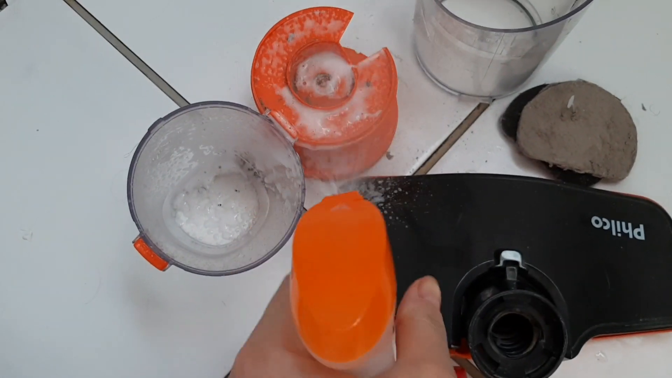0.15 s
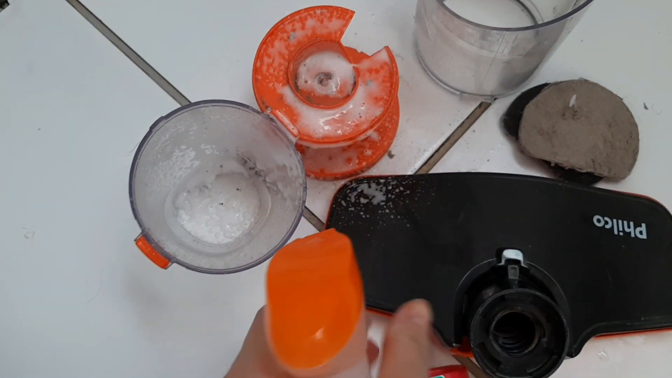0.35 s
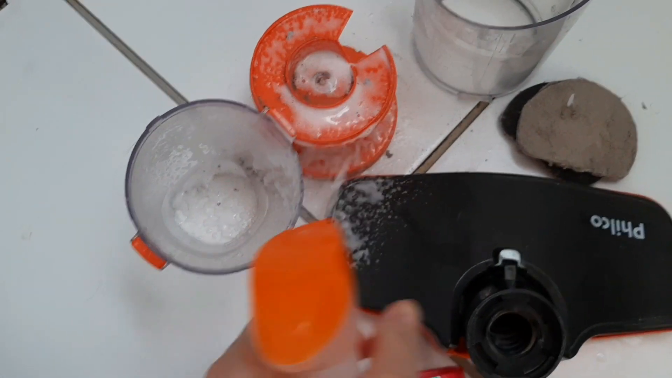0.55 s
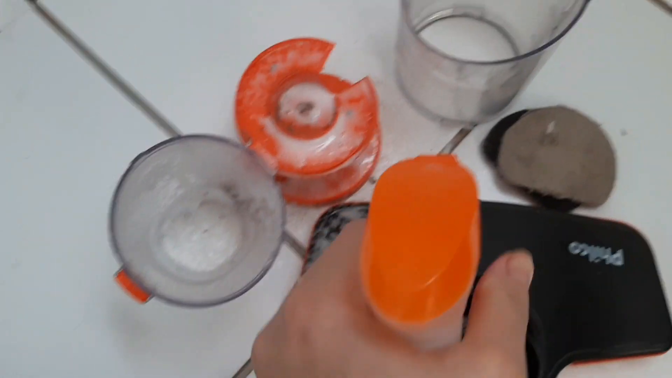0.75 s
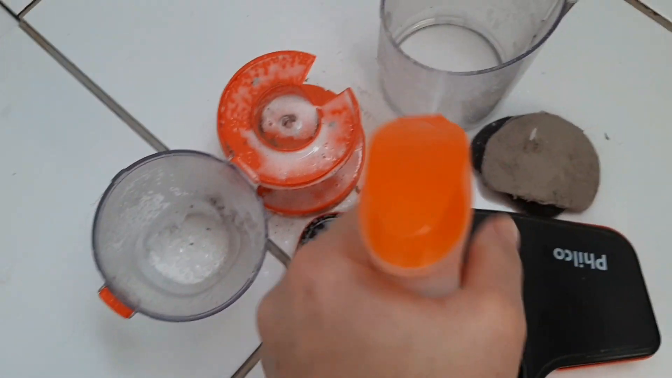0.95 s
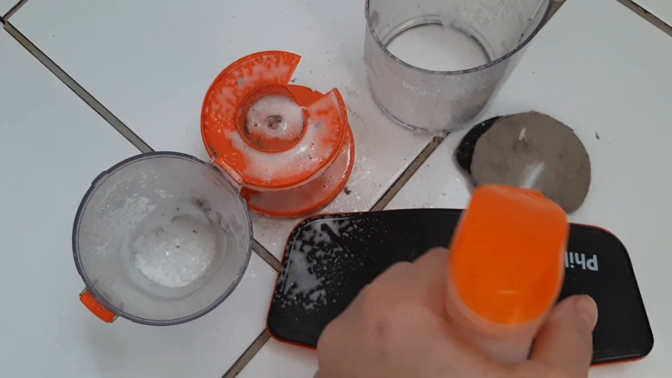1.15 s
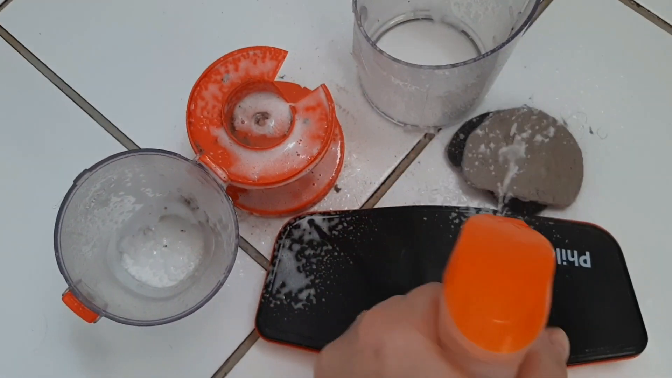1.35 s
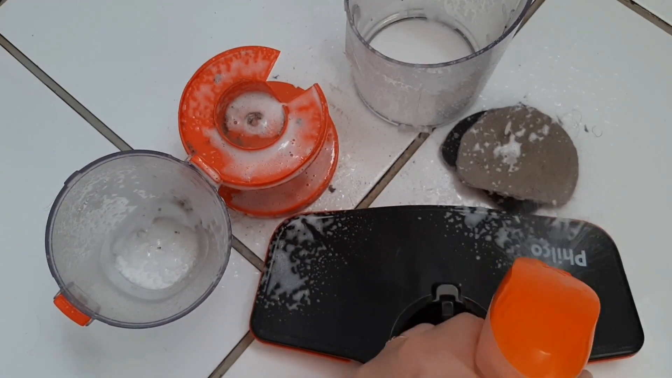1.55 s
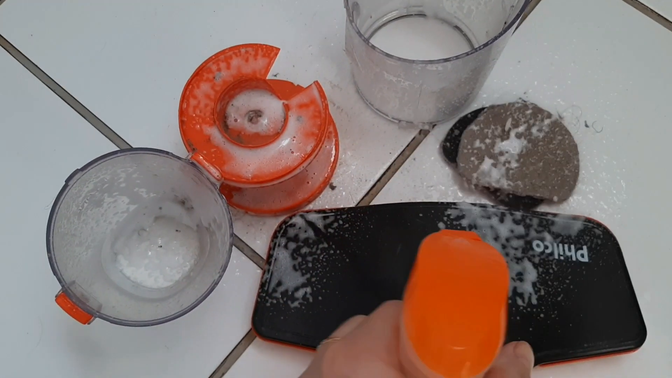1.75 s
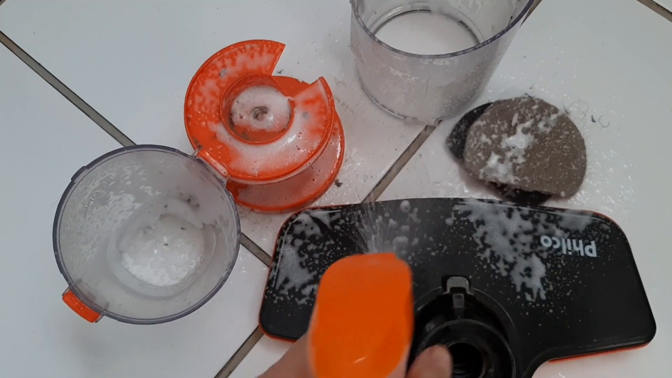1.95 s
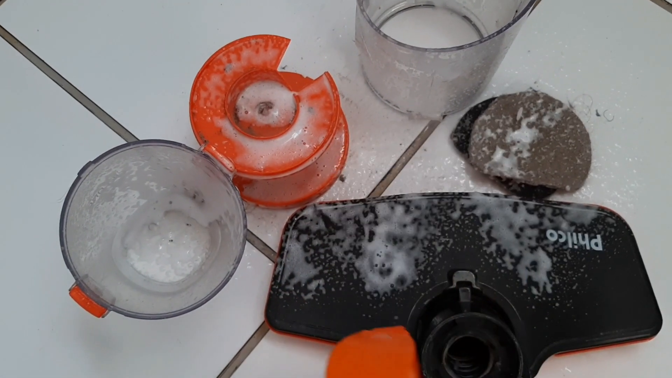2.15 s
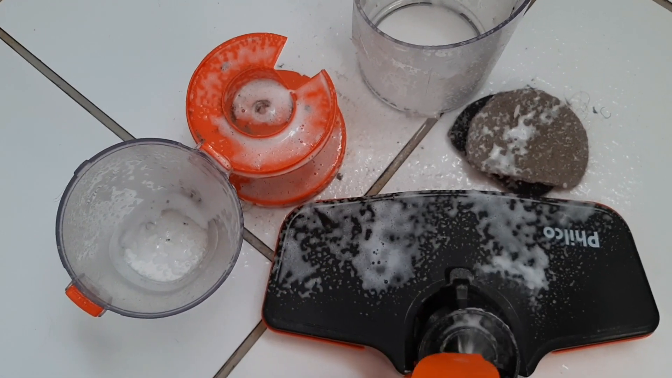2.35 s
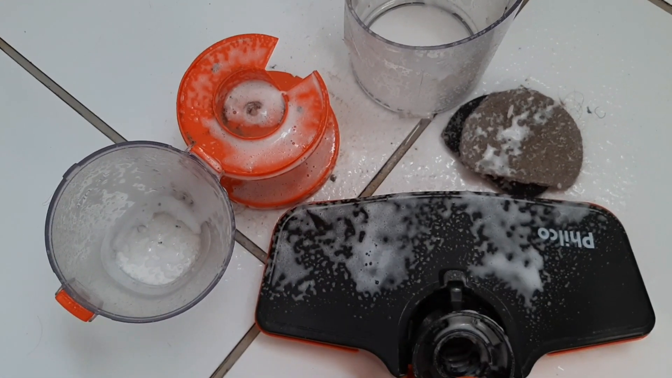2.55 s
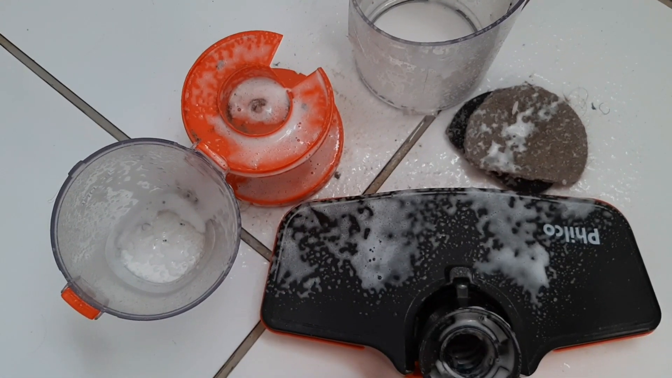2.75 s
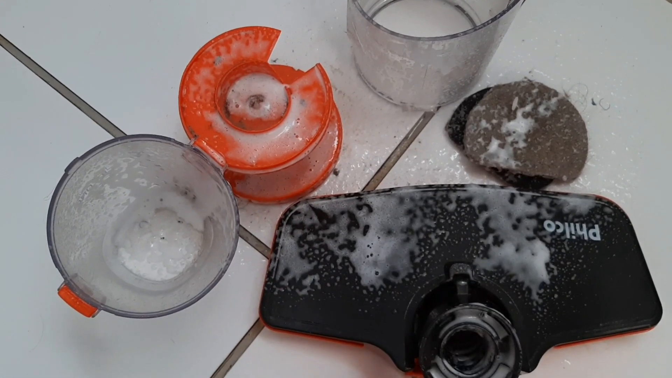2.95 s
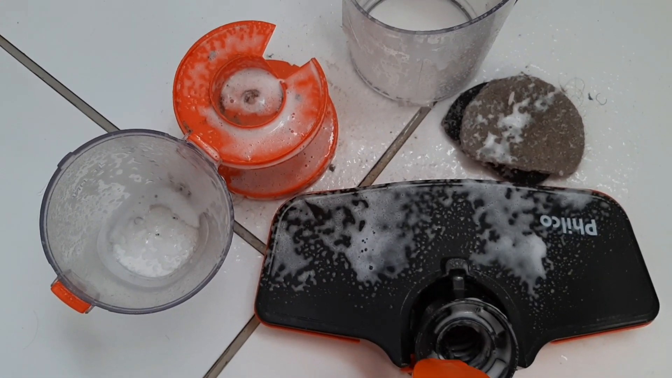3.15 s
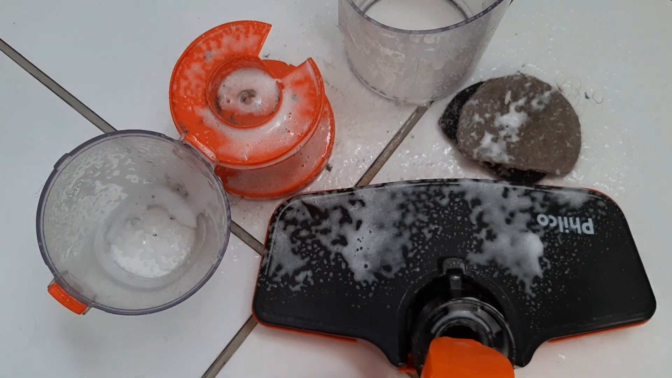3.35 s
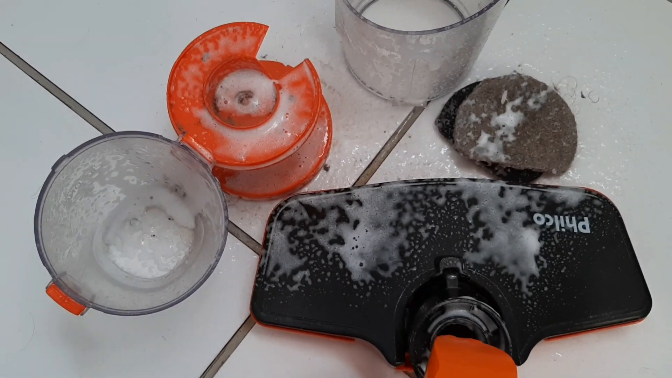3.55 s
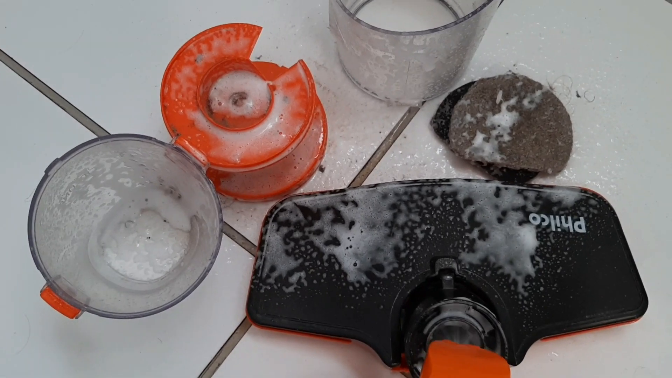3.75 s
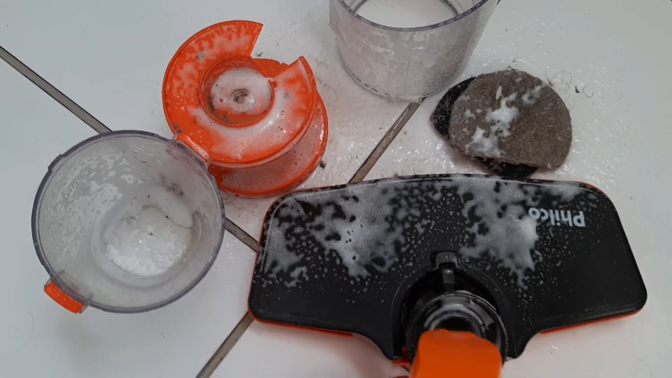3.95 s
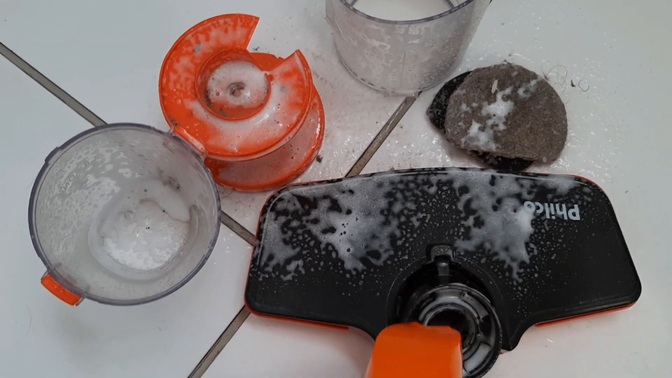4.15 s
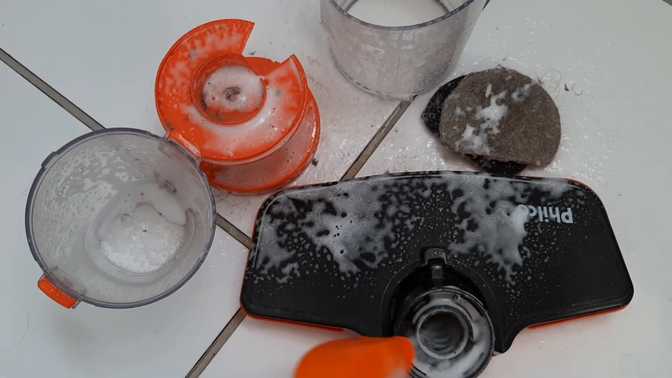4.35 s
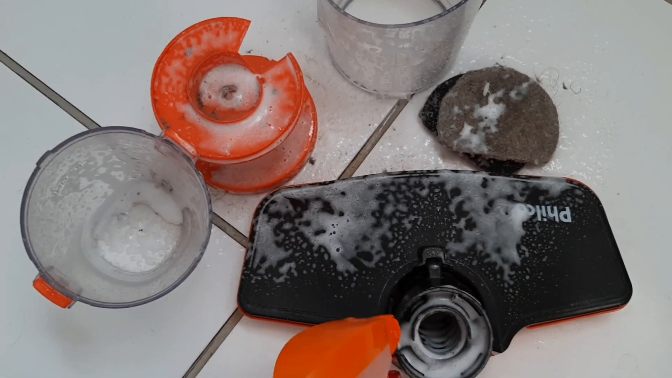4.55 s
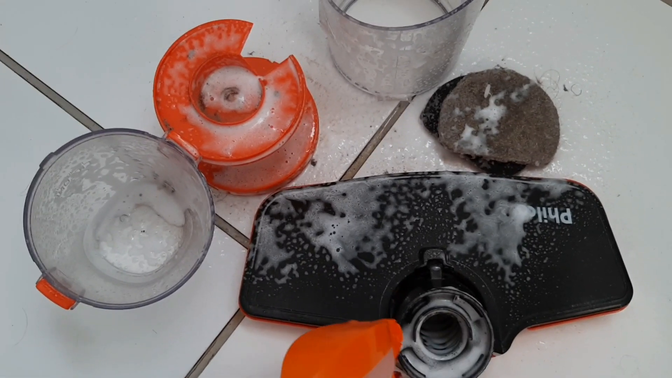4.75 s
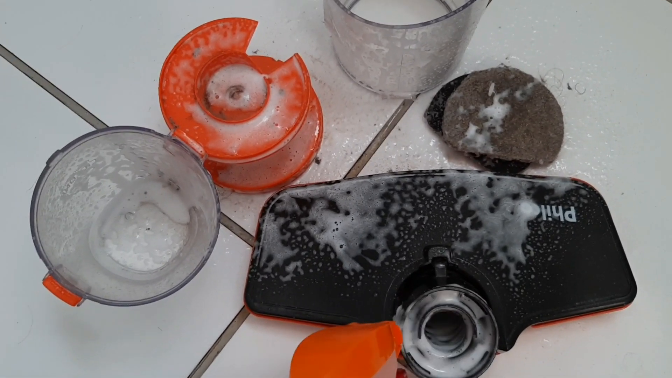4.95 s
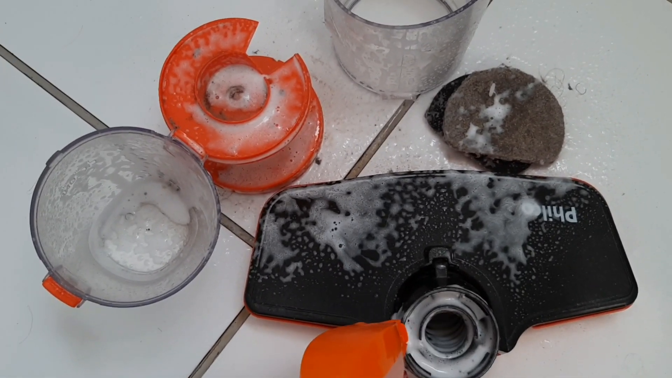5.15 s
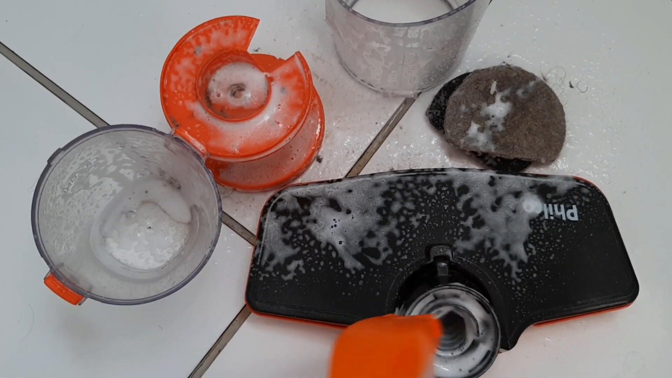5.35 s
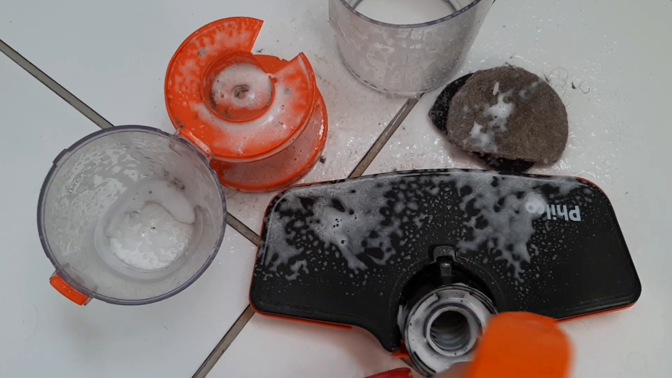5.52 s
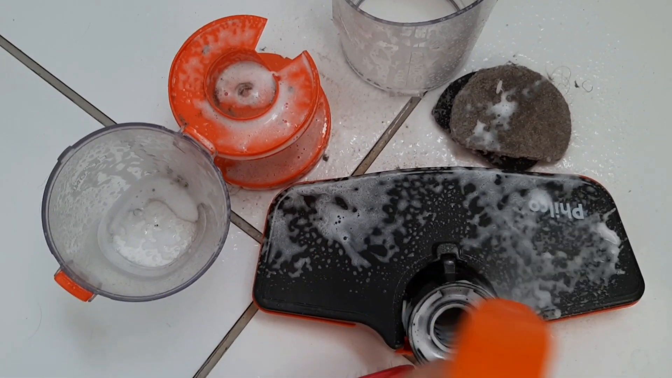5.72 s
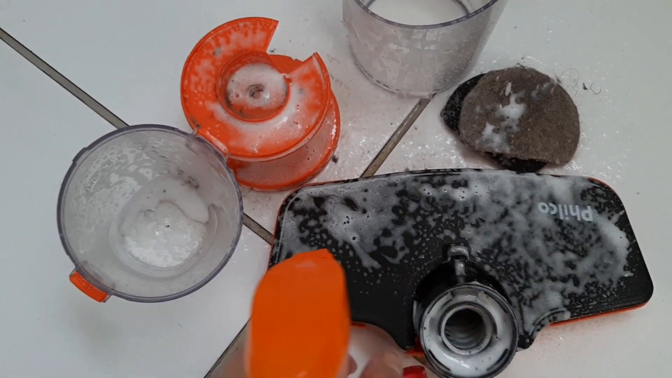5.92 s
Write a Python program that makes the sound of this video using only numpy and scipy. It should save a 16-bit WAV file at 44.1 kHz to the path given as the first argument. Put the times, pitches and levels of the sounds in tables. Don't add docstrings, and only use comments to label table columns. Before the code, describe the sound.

Short, bright bursts of spray patter on plastic parts, the pump gurgling and bottle knocking between squeezes, close up in a quiet tiled room.

```python
import sys
import numpy as np
from scipy import signal
from scipy.fft import rfft, irfft
from scipy.io import wavfile
from scipy.ndimage import uniform_filter1d, map_coordinates

SR = 44100
rng = np.random.default_rng(int(sys.argv[2]) if len(sys.argv) > 2 else 0)


def dump(signal):
    limited = np.clip(np.atleast_2d(signal).T, -1, 1)
    pcm = np.round(limited * 32767).astype(np.int16)
    wavfile.write(sys.argv[1], SR, pcm)


def how_loud(loudness_db):
    steps = np.asarray(loudness_db, float) / 20
    return 10 ** steps


N = 268128

# valve_opens_s, stroke_s, jet_db, mist_db, valve_suddenness_db
SQUEEZES = [(0.048, 0.21, -31.5, 1, 2.5), (0.42, 0.2, -33.5, 0, 7.5), (0.796, 0.24, -35, 1.5, 6.5),
            (1.188, 0.22, -34.5, 1, 1), (1.543, 0.222, -33, -0.5, -6.5), (1.926, .24, -35.5, 0.5, 7.5),
            (2.298, 0.2, -35.5, -1, 8.5), (2.684, 0.21, -36.5, 1.5, 5), (3.698, 0.25, -34, -0.5, 2.5),
            (4.247, 0.26, -35.5, 1, 2.5), (4.837, 0.23, -36.5, 1, 3), (5.253, 0.17, -34.5, 1, 5.5),
            (5.657, 0.21, -34, 2.5, 1.5), (6.019, 0.14, -34, 2.5, 4.5)]
# patter_db, first_hollow_hz, last_hollow_hz
AIMS = [(0, 1330, 1230), (1.5, 1290, 1330), (3, 1240, 1200), (2.5, 1240, 1520), (2.5, 1300, 1240),
        (5, 1400, 1100), (3.5, 1280, 1170), (4.5, 1300, 1240), (5, 1400, 1400), (7, 1200, 1500),
        (3, 1600, 1200), (6.5, 1490, 1490), (5, 950, 1400), (3.5, 820, 1600)]
# duration_s, level_re_jet_db
LEAKS = [(.003, -32), (.018, -30), (.002, -33), (.007, -29), (.009, -25), (.014, -25.5), (.003, -32),
         (.001, -38), (.020, -28.5), (.014, -27), (.020, -31), (.002, -34), (.001, -36), (.002, -32)]
# time_from_opening_s, jet_db, mist_re_jet_db, patter_re_jet_db
PRESSURE_RISE = [(0., -16, 2.5, -19), (0.015, -7.5, 5, -19.5), (0.046, -3.5, 9.5, -18.5),
                 (.09, -2, 11, -17)]
# time_from_stroke_end_s, jet_db, mist_re_jet_db, patter_re_jet_db
PRESSURE_SAG = [(-.06, -0.46, 6.5, -17.5), (-.025, -3.5, 1.5, -17.5), (0., -9.5, -2.5, -14),
                (.04, -23.5, -1, -10.5), (.11, -45, -5, 0)]
# freq_hz, density_db_per_hz
SPRAY_SPECTRUM = [(290, -62), (500, -58), (1010, -32), (1240, -55.5), (1840, -11), (2160, -6.5), (3210, 10),
                  (3660, 9), (5840, 1.5), (8060, -8), (8670, -13), (11100, -12.5), (14700, -10),
                  (15800, -10.5), (16500, -27)]
FULLNESS_DB = [-9, -8, -3.5, -7, -9.5, -4.5, -5, -2.5, -7, -2, -2, -3, -3, -0.5]
CORE_DB = [-5, -1.5, 3, 2, 1, 1, -0.5, 0, -2, -2.5, -1.5, -2, -5.5, -4.5]
STEP_HZ, CORE_TOP_HZ = 3680, 4740
# freq_hz, width_hz, gain_db
PART_PEAKS = [(866, 163, -14.5), (930, 220, -11), (1238, 140, 2.5), (1470, 170, -0.5)]
FLOOR_ECHO_S, FLOOR_ECHO_DB = 0.0001682, -9

# vent_db, hiss_db, hiss_rate_db_per_s, vent_rate_db_per_s, last_foam_db
RELEASES = [(-76, -78.5, -30, -30, -83.5), (-73, -68.5, -87, -6, -87), (-79, -65, 39, 40, -73),
            (-67.5, -62.5, -81, 21, -82), (-72, -78, -140, 5.5, -85), (-71, -65.5, -140, -77, -84),
            (-63, -72, -5, 70, -87), (-73, -71.5, -22, 70, -74), (-66, -67.5, -27, -20, -73),
            (-78.5, -77.5, -73, -16, -91), (-69.5, -80, -130, 30, -70), (-85, -71.5, -120, -56, -79),
            (-57.5, -65.5, -150, -150, -78), (-61, -63.5, -79, 5, -80)]
LET_GO_S, MAX_SUCK_S = 0.036, 0.24
FOAM_DB, FOAM_DB_PER_S, FOAM_LAST_DB_PER_S = -40, -260, -69
# time_s, vent_db, hiss_db
GULPS = [
    (1.47, -60, -65.5),
    (3.25, -77.5, -83),
    (3.32, -70, -82.5),
    (3.4, -81, -100),
    (3.5, -88, -103),
    (4.13, -90, -87),
    (4.2, -71.5, -80),
    (4.574, -64, -69),
    (4.64, -79.5, -74.5),
    (.75, -58, -63.5),
]
GULP_DB_PER_S = 272.5, 194.5
# freq_hz, width_hz, gain_db
VENT_PEAKS = [(1080, 340, 4), (1200, 190, -4), (1452, 360, 8)]
# freq_hz, width_hz, gain_db
PUMP_PEAKS = [(2100, 200, 3.5), (3850, 430, 0.5), (4830, 680, -8.5), (5780, 1200, -15.5),
              (3520, 3100, -1.5)]
# time_s, pitch_hz, level_db
WHISTLES = [
    [(3.0, 1585, -75), (3.1, 1560, -72.5), (3.2, 1532, -77.5), (3.3, 1515, -73), (3.444, 1501, -76),
     (3.6, 1485, -80.5), (3.69, 1491, -84)],
    [(3.7, 1458, -86), (3.722, 1520, -60), (3.86, 1588, -61), (4.25, 1550, -102)],
]
# peak_s, pitch_hz, level_db, swell_s, fade_s
GURGLES = [(2.02, 690, -60, 0.022, 0.032), (2.11, 800, -52.5, .006, 0.0088),
           (2.132, 763, -46.5, .01, 0.021), (2.188, 1050, -46.5, 0.013, 0.04),
           (2.235, 1080, -57.5, .01, 0.017), (2.15, 1997, -41, 0.026, 0.045),
           (2.42, 1193, -47, 0.0085, 0.0069), (2.446, 1082, -46, 0.0053, .012),
           (2.314, 1270, -54, .008, 0.013), (.018, 1230, -66, 0.0057, .012), (0.229, 1310, -62, .01, 0.015),
           (0.509, 1280, -51.5, 0.017, 0.014), (.555, 1320, -51, 0.011, .02),
           (0.891, 1260, -48, .012, .015), (1.27, 1540, -46.5, 0.014, .015),
           (1.466, 1238, -50, .004, 0.017), (5.779, 1163, -49, .008, .012), (2.992, 1238, -58, .002, 0.016),
           (3.27, 1046, -78.5, .05, .1), (4.61, 1022, -56, 0.028, 0.035), (4.73, 1015, -55.5, .016, 0.062),
           (5.692, 952, -49.5, 0.014, 0.01), (5.711, 896, -40.5, 0.0051, 0.0059),
           (5.73, 922, -48, 0.0067, 0.014)]
GURGLE_EDGE_DB = -14

# freq_hz, gain_db, t60_s
WALL_MODES = [(250, 1.5, 0.097), (289, 5, 0.15), (350, 11.5, 0.066), (400, 3.5, 0.13), (460, 3, 0.035)]
# freq_hz, gain_db, t60_s
BELLY_MODES = [(128.1, -5.5, 0.15), (160.4, 3, 0.087)]
# freq_hz, gain_db, t60_s
NECK_MODES = [(606, -4.5, 0.081), (687, 3.5, 0.029), (962, -4.5, 0.1), (1035, 6.5, 0.034),
              (1170, 10.5, 0.028), (1270, 1.5, 0.02)]
# time_s, peak_db, favoured_wall_hz, dull_side_db, bright_side_db
KNOCKS = [(0.178, -49, 425, -19, 19), (1.005, -48.5, 285, -26, -5), (2.156, -28, 288, 2, 5.5),
          (2.444, -40, 350, -11, 6), (2.487, -31, 288, -36, 1), (2.989, -62, 336, -16, 2),
          (4.18, -52, 342, -27, -23), (4.34, -34.5, 387.4, -21.5, 1), (4.505, -35, 395, -32, 5),
          (4.853, -45, 250, -21, 3), (5.33, -40, 391.3, -15, -7), (5.352, -35, 350, -26, -10),
          (5.474, -34, 333, -5, -9), (5.497, -39, 287, 2.5, -2), (5.774, -28, 350, -27, 1),
          (5.792, -30.5, 350, -7, 3), (5.826, -42.5, 300, 4.5, -10), (5.903, -41.5, 250, -8, -1),
          (5.945, -41.5, 250, 4, -11), (4.613, -43.5, 250, -8, 3), (4.712, -37, 350, -21, -11),
          (4.738, -36, 366, -16, 0), (5.09, -62, 350, -20, -10), (.79, -56, 300, -19.5, -15)]
# time_s, peak_db, favoured_wall_hz, dull_side_db, bright_side_db
BUMPS = [
    (2.172, -33, 283, 1.5, 6),
    (2.505, -41, 286, -22, -22),
    (4.558, -36.5, 390, -22.5, -7),
    (4.599, -36, 236, -25, 0),
    (4.712, -30.5, 312, -44, -10),
    (5.755, -40.5, 350, -14, -7),
    (5.975, -45.5, 283, -1, -16),
    (6.05, -42, 333.6, -19, -11),
    (4.525, -36, 403, -32, -2),
    (4.655, -43.5, 250, -12.5, -10),
]
KNOCK_RISE_S, BUMP_RISE_S = 0.0059, 0.026
# time_s, held_s, creak_db, slosh_db
GRIPS = [(.13, 0.033, -65, -66), (0.189, 0.014, -57.5, -79), (.5, 0.04, -69, -69), (.68, 0.13, -69, -82),
         (.8, 0.13, -61.5, -85), (1.0, 0.089, -62.5, -73), (1.2, 0.18, -70.5, -79), (1.42, 0.19, -75, -86),
         (1.66, 0.24, -85, -79.5), (1.93, 0.078, -87.5, -81), (2.164, 0.029, -46.5, -47),
         (2.36, 0.062, -68, -66), (2.489, 0.035, -46, -56), (2.66, 0.26, -69.5, -80.5),
         (3.0, 0.069, -64, -63), (3.71, 0.083, -63, -97), (4.06, 0.017, -71.5, -99.5),
         (4.18, 0.011, -64, -83.5), (4.351, 0.04, -52.5, -55.5), (4.46, 0.038, -58, -79.5),
         (4.51, 0.15, -49, -71), (4.74, 0.03, -50.5, -78), (4.85, 0.19, -56.5, -64),
         (5.339, 0.042, -45, -57), (5.24, 0.1, -64.5, -75), (5.39, .04, -58, -66),
         (5.483, 0.024, -56, -56.5), (5.787, 0.03, -46.5, -51.5), (5.86, 0.46, -61.5, -61)]
# swell_db_per_s, fade_db_per_s
GRIP_DB_PER_S = [(900, 200), (800, 150)]
# time_s, held_s, rumble_db
SHIFTS = [(.12, .12, -91), (.47, 0.066, -80), (.89, .08, -73), (1.26, .14, -66), (1.5, 0.33, -85),
          (2.16, .07, -67), (2.46, .22, -70), (2.95, 0.027, -75.5), (3.83, 0.21, -70.5),
          (4.3, 0.073, -79.5), (4.61, .14, -68), (5.36, .16, -82), (5.82, 0.054, -51.5), (5.94, .08, -69)]
SHIFT_DB_PER_S = 404.5, 130.5
REST_DB = -84, -90, -83
# time_s, level_db, pitch_hz, t60_s
TICKS = [(.013, -68, 1270, .04), (.178, -48, 900, 0.032), (1.462, -66, 1300, .05),
         (2.156, -21.5, 1110, 0.015), (2.158, -38, 617, 0.066), (2.444, -46, 1070, 0.028),
         (2.617, -54, 1240, 0.034), (2.667, -64, 1240, .03), (2.821, -48, 1240, 0.04),
         (2.886, -47, 1240, 0.044), (2.99, -57, 1230, 0.044), (4.593, -48, 990, 0.045),
         (4.715, -53, 1103, 0.037), (5.233, -64, 1207, .03), (5.638, -73, 1234, .03),
         (5.776, -35.5, 1133, .03), (5.834, -44, 500, .025), (5.9, -49, 1505, 0.036),
         (5.912, -45, 1490, .02), (5.985, -61, 1170, .03)]
TICK_RISE_S, TICK_SPREAD = .0012, .14

# freq_hz, density_db_per_hz
ROOM_SPECTRUM = [(15, -50.5), (25, -15.5), (76, -17), (146, -17), (1120, -29), (1350, -20.5), (1490, -9),
                 (1650, -26), (2600, -34.5), (7510, -46.5), (15200, -33), (16500, -33.5)]
ROOM_DB = -75.5

# freq_hz, left_gain_db (lost on the right)
PORT_DB = [(60, -0.63), (200, -0.7), (700, -0.84), (2400, 0.65), (5000, 1.03), (14000, 1.87)]
# freq_hz, gain_db
LEFT_PORT = [(5300, 0), (6000, 4.5), (7050, -4), (7750, 1), (8400, -2.5), (9000, 0)]
# freq_hz, sum_gain_db (half of it inverted on the difference)
OUT_OF_STEP = [(1600, 0), (1740, -3), (1900, 0), (2950, 1.5), (3300, -2), (3600, 0)]
PORT_LAG_S = .0002
TOP_HZ = 15720


def spray():
    tables = strokes()
    jet_db = played(tables, column=1)
    mist_db, patter_db, hollow_hz = (played(tables, column=c, silent=False) for c in (2, 3, 4))
    full_db, core_db = per_squeeze(FULLNESS_DB), per_squeeze(CORE_DB)
    lag_s = FLOOR_ECHO_S * (1 + .04 * walk(4))

    def cloud():
        big_drops = how_loud(10) * (rng.random(N) < 60 / SR)
        x = off_tiles(sputter(2.2, 0.51) * (1 + big_drops), lag_s)
        upper = colour(x, SPRAY_SPECTRUM, CORE_TOP_HZ, 9330)
        core = how_loud(core_db) * colour(x, SPRAY_SPECTRUM, STEP_HZ, CORE_TOP_HZ)
        full = how_loud(full_db) * colour(x, SPRAY_SPECTRUM, 1700, STEP_HZ)
        jet = level(upper + core + full, 1.7)
        mist = level(colour(x, SPRAY_SPECTRUM, 8394), 1.75) * how_loud(mist_db)
        return how_loud(jet_db) * (jet + mist + how_loud(patter_db) * patter(hollow_hz))

    shared = ports(cloud(), 0.14)
    own = np.array([ports(cloud(), 0.031)[0], ports(cloud(), 0.091)[1]])
    return how_loud(-5) * (shared + how_loud(-2.0) * own)


def patter(hollow_hz):
    drops = sputter(3, 2.6)
    tilt = [(600, -4), (1100, -2.5), (1600, -1.5), (1900, -3)]
    parts = level(colour(resonate(drops, PART_PEAKS), tilt), 0.88)
    splash = level(colour(drops, SPRAY_SPECTRUM, 740, 2220), 0.91)
    flutter_db = 3 * walk(50)
    return parts + splash + how_loud(-4.0 + flutter_db) * wavering(hollow_hz, 150)


def strokes():
    tables = []
    for squeeze, aim, (leak_s, leak_db) in zip(SQUEEZES, AIMS, LEAKS):
        s, stroke_s, jet_db, mist_db, sudden_db = squeeze
        patter_db, first_hz, last_hz = aim
        weep = [(-.003 - leak_s, leak_db - 1.0, 1, -22), (-.002, leak_db + 5.0, 2, -22)]
        sag = [(stroke_s + r[0], *r[1:]) for r in PRESSURE_SAG]
        rows = np.array([*weep, *PRESSURE_RISE, *sag])
        u = rows[:, 0]
        sudden = sudden_db * np.exp(-u / 0.024) * (u >= 0)
        hollow_hz = np.interp(u, [.05, stroke_s], [first_hz, last_hz])
        others_db = rows[:, 2:] + [mist_db, patter_db]
        tables.append(np.c_[s + u, jet_db + sudden + rows[:, 1], others_db, hollow_hz])
    return tables


def per_squeeze(values_db):
    tables = [[(r[0], db), (r[0] + r[1], db)] for r, db in zip(SQUEEZES, values_db)]
    return played(tables, column=1, silent=False)


def off_tiles(x, lag_s):
    at = np.arange(N) - lag_s * SR
    return x + how_loud(FLOOR_ECHO_DB) * map_coordinates(x, [at], order=1)


def refill(vent_gain, hiss_gain, foam_gain):
    vent = level(resonate(resonate(sputter(0.57, 2.0), VENT_PEAKS), VENT_PEAKS), 0.39) * vent_gain
    whistle = wavering(played(WHISTLES, column=1, silent=False), 40, 2.)
    whistle = whistle * how_loud(3.0 + played(WHISTLES, column=2))
    drawn = resonate(sputter(1.2, 1.4), PUMP_PEAKS)
    pump = level(colour(drawn, [(5600, -2.0), (8000, -5.0)]), 5.34) * hiss_gain
    foam = level(colour(sputter(3, 1.7), SPRAY_SPECTRUM, 9700), 2.6) * foam_gain
    return vent + whistle + pump + foam


def releases():
    t, gains = np.arange(N) / SR, np.zeros((3, N))
    ends = [(-.03, -50)] + [(s + stroke_s + LET_GO_S, db) for s, stroke_s, db, *_ in SQUEEZES]
    for (s, jet_db), (opens_s, *_), row in zip(ends, SQUEEZES, RELEASES):
        vent_db, hiss_db, hiss_rate, vent_rate, last_db = row
        u = t - s
        on = np.clip(np.minimum(u / .02 + 1, (opens_s - t) / .01 + 1), 0, 1)
        pull = on * how_loud(-350 * np.maximum(u - MAX_SUCK_S, 0))
        u = np.clip(u, 0, 1)
        foam = how_loud(jet_db + FOAM_DB + FOAM_DB_PER_S * u) + how_loud(last_db + FOAM_LAST_DB_PER_S * u)
        u = np.minimum(u, MAX_SUCK_S)
        gains += [pull * how_loud(vent_db + vent_rate * u), pull * how_loud(hiss_db + hiss_rate * u), on * foam]
    s, *peaks_db = np.transpose(GULPS)
    gains[:2] += [swells(s, 0 * s, db, *GULP_DB_PER_S) for db in peaks_db]
    return gains


def gurgles():
    out = np.zeros(N)
    for s, hz, db, swell_s, fade_s in GURGLES:
        u = np.arange(-int(2 * swell_s * SR), int(3 * fade_s * SR)) / SR
        i = np.clip(int(s * SR) + np.arange(len(u)) + int(u[0] * SR), 0, N - 1)
        drift = np.interp(u, u[0] + .003 * np.arange(100), rng.standard_normal(100))
        shape_db = GURGLE_EDGE_DB * np.where(u < 0, (u / swell_s) ** 2, .7 * u / fade_s)
        pitch_hz = hz * (1 + .04 * np.roll(drift, 90))
        tone = np.sin(2 * np.pi * np.cumsum(pitch_hz) / SR)
        out[i] += how_loud(db + shape_db - 2 + 6 * drift) * tone
    return how_loud(3.5) * np.array([out, how_loud(-1.0) * np.roll(out, -int(PORT_LAG_S * SR))])


def bottle():
    creak = colour(ring(sputter(3.4, 3.3), WALL_MODES), [(200, 2.8), (600, 3.5)], 190, 490)
    slosh = colour(ring(sputter(1.75, 1.8), BELLY_MODES), [(100, -9.0), (300, 7.5)], 96, 250)
    rumble = colour(sputter(0, 3.2), [(30, -26.5), (55, -14.5), (76, 2), (95, -16.0)], 25, 120)
    sounds = level(creak, -2.5), level(slosh, -9.0), level(rumble, 0)
    s, held_s, *peaks_db = np.transpose(GRIPS)
    gains = [swells(s, held_s, db, *rates) for db, rates in zip(peaks_db, GRIP_DB_PER_S)]
    gains.append(swells(*np.transpose(SHIFTS), *SHIFT_DB_PER_S))
    held = sum(x * (how_loud(db) + g) for x, g, db in zip(sounds, gains, REST_DB))
    blows = how_loud(-9.0) * knocks(KNOCKS, KNOCK_RISE_S) + how_loud(1.0) * knocks(BUMPS, BUMP_RISE_S)
    return ports(held + blows, 0.035, -5.5)


def knocks(blows, rise_s):
    out, t = np.zeros(N + SR), np.arange(SR // 3) / SR
    for s, db, wall_hz, dull_db, bright_db in blows:
        modes = [(hz, g - 25 * abs(np.log(hz / wall_hz)), t60) for hz, g, t60 in WALL_MODES]
        modes += [(hz, g + dull_db - 0.5, t60) for hz, g, t60 in BELLY_MODES]
        modes += [(hz, g + bright_db - 2.5, t60) for hz, g, t60 in NECK_MODES]
        body = 0
        for (hz, g, t60), phase in zip(modes, 2 * np.pi * rng.random(len(modes))):
            body = body + how_loud(g - 60 * t / t60) * np.sin(2 * np.pi * hz * t + phase)
        start = int(s * SR)
        out[start:start + len(t)] += how_loud(db) * (1 - np.exp(-(t / rise_s) ** 2)) * body
    return out[:N]


def ticks():
    out, t = np.zeros(N + SR), np.arange(SR // 10) / SR
    rise = 1 - np.exp(-(t / TICK_RISE_S) ** 2)
    for (s, db, hz, t60), off in zip(TICKS, rng.standard_normal((len(TICKS), 5))):
        pitches_hz = hz * (1 + TICK_SPREAD * (np.arange(-2, 3) + 0.33 * off))
        cluster = np.sin(2 * np.pi * np.outer(pitches_hz, t)).sum(0)
        start = int(s * SR)
        out[start:start + len(t)] += how_loud(db - 4 - 60 * t / t60) * rise * cluster
    return np.array([out[:N], np.roll(out[:N], -int(PORT_LAG_S * SR))])


def room():
    mid, side = (colour(how_loud(walk(14)) * rng.standard_normal(N), ROOM_SPECTRUM) for _ in range(2))
    side = colour(side, [(100, -9.0), (400, -7.0), (900, 0.5), (16000, 0.0)])
    return level(np.array([mid + side, mid - side]), ROOM_DB)


def ports(x, t60, apart_db=-10):
    t = np.arange(int(t60 * SR)) / SR
    cuts = [0, *(int((row[0] - .035) * SR) for row in SQUEEZES[1:]), N]
    apart = np.zeros((2, N + SR))
    for a, b in zip(cuts, cuts[1:]):
        paths = rng.standard_normal((2, SR // 4))[:, :len(t)] * np.exp(-np.log(1000) * t / t60)
        paths /= np.sqrt(np.sum(paths ** 2, 1, keepdims=True))
        i = np.arange(a, min(b + 600, N))
        blend = np.clip(np.minimum((i - a) / 600, (b + 600 - i) / 600), 0, 1)
        apart[:, a:a + len(i) + len(t) - 1] += signal.fftconvolve((x[i] * blend)[None], paths, axes=1)
    apart = apart[:, :N]
    low, high = (signal.butter(2, 590, kind, fs=SR, output="sos") for kind in ("low", "high"))
    alike = np.array([np.roll(x, int(PORT_LAG_S * SR)), x])
    return signal.sosfilt(low, alike + how_loud(apart_db) * apart) + signal.sosfilt(high, apart)


def sputter(fast_db, slow_db):
    return how_loud(fast_db * walk(700) + slow_db * walk(60)) * rng.standard_normal(N)


def wavering(hz, width_hz, steady=0.):
    slow = signal.lfilter([1], [1, -np.exp(-np.pi * width_hz / SR)], rng.standard_normal((2, N)))
    swing = level(slow[0], 0) + 1j * level(slow[1], 0) + steady
    return level((swing * np.exp(2j * np.pi * np.cumsum(hz) / SR)).real, 0)


def ring(x, modes):
    out = 0
    for hz, db, t60 in modes:
        pole = np.exp(2j * np.pi * hz / SR - np.log(1000) / (t60 * SR))
        out = out + how_loud(db) * signal.lfilter([1], [1, -pole], x + 0j).imag
    return out


def resonate(x, peaks):
    return sum(how_loud(db) * signal.lfilter(*signal.iirpeak(hz, hz / width, SR), x) for hz, width, db in peaks)


def colour(x, points, lo_hz=5, hi_hz=21000):
    hz = np.arange(N // 2 + 1) * SR / N + 1
    f, db = np.transpose(points)
    edges = 1 / np.sqrt((1 + (lo_hz / hz) ** 16) * (1 + (hz / hi_hz) ** 16))
    return irfft(rfft(x) * how_loud(np.interp(np.log(hz), np.log(f), db)) * edges, N)


def swells(starts, holds, peaks_db, swell, fade):
    t = np.arange(0, N, 32) / SR
    gain = 0
    for s, held_s, peak_db in zip(starts, holds, peaks_db):
        gain = gain + how_loud(peak_db - swell * np.maximum(s - t, 0) - fade * np.maximum(t - s - held_s, 0))
    return np.interp(np.arange(N) / SR, t, gain)


def played(tables, column, silent=True):
    rows = []
    for table in tables:
        points = np.array(table)[:, [0, column]]
        if silent:
            points = [(points[0, 0] - .006, -110), *points, (points[-1, 0] + .012, -110)]
        rows += [*points]
    s, value = np.transpose(rows)
    return np.interp(np.arange(N) / SR, s, value)


def walk(rate_hz):
    k = max(int(SR / rate_hz), 1)
    held = np.repeat(rng.standard_normal(N // k + 1), k)
    return 1.3 * uniform_filter1d(uniform_filter1d(held, k), k)[:N]


def level(x, db):
    return x * how_loud(db) / np.sqrt(np.mean(x ** 2))


def scene():
    gains = releases()
    pump = np.array([how_loud(1.0) * refill(*gains), how_loud(-3.5) * refill(*gains)])
    left, right = spray() + pump + gurgles() + bottle() + ticks() + room()
    left = colour(colour(left, PORT_DB), LEFT_PORT)
    right = colour(right, np.multiply(PORT_DB, [1, -1]))
    mid = colour(left + right, OUT_OF_STEP)
    side = colour(left - right, np.multiply(OUT_OF_STEP, [1, -.5]))
    return np.array([mid + side, mid - side]) / 2


def low_pass(x):
    return signal.sosfilt(signal.butter(12, 17040, fs=SR, output="sos"), x)


def record(dry):
    cut = signal.sosfilt(signal.ellip(12, .2, 90, TOP_HZ, fs=SR, output="sos"), dry)
    return low_pass(cut)


dry = scene()
out = record(dry)
dump(out)
```